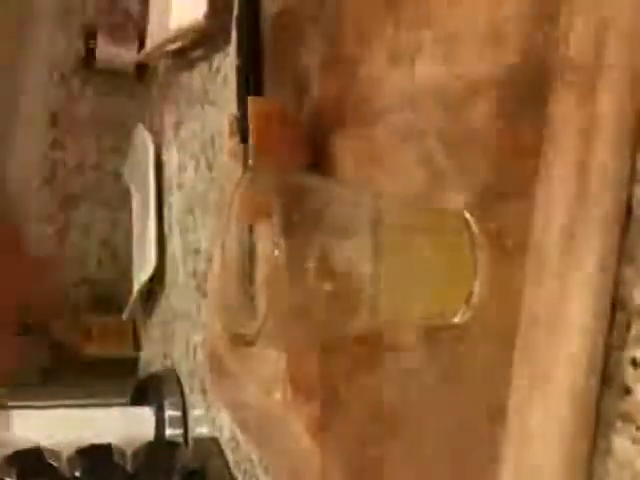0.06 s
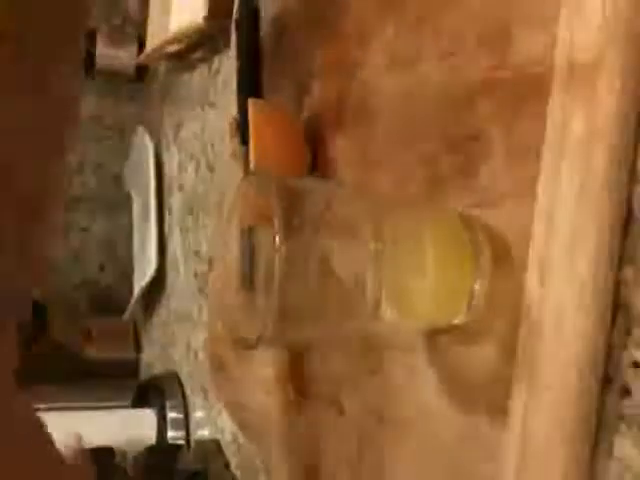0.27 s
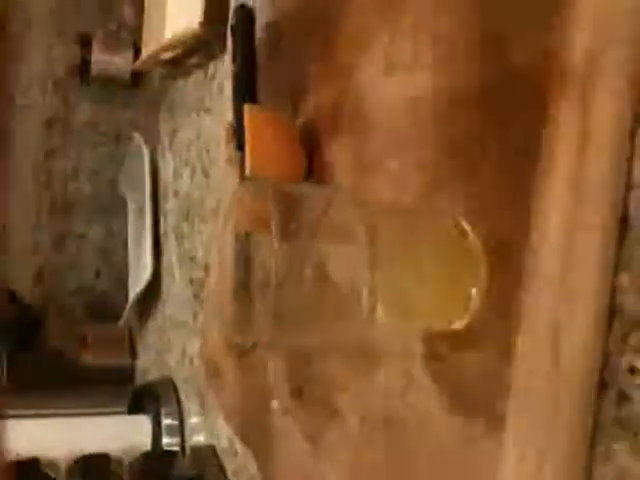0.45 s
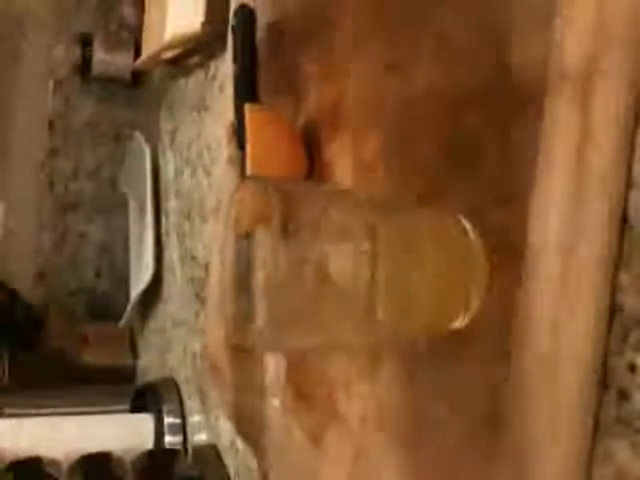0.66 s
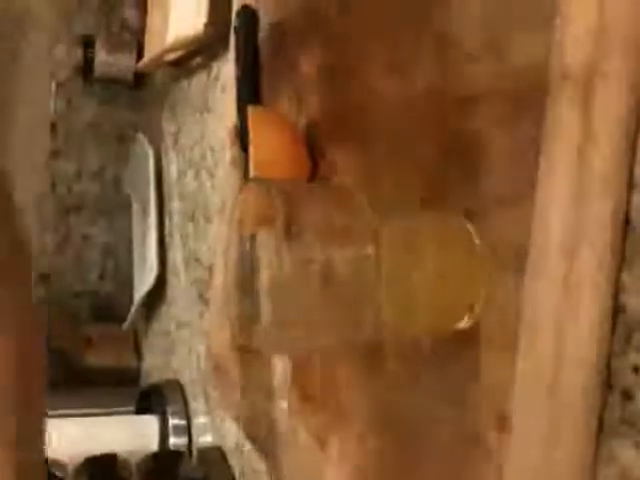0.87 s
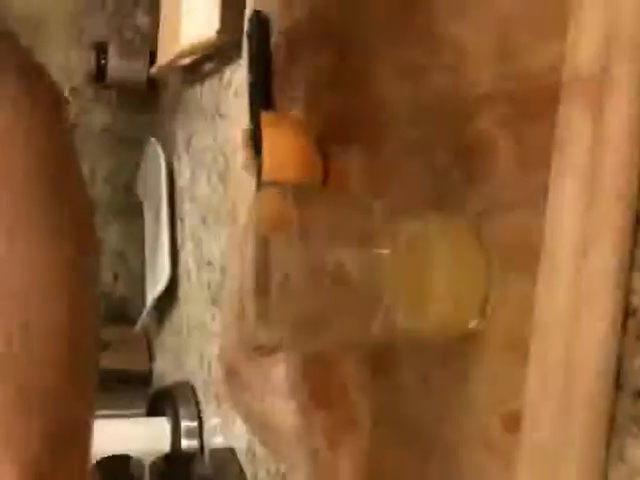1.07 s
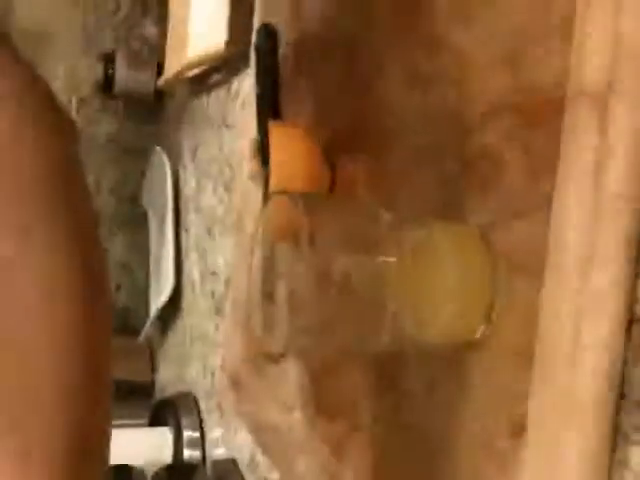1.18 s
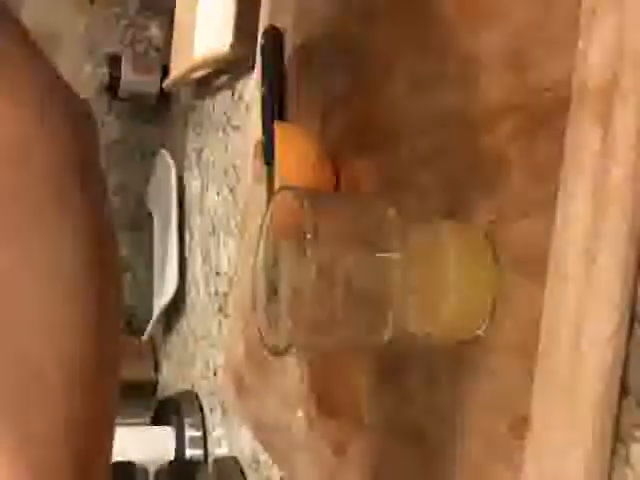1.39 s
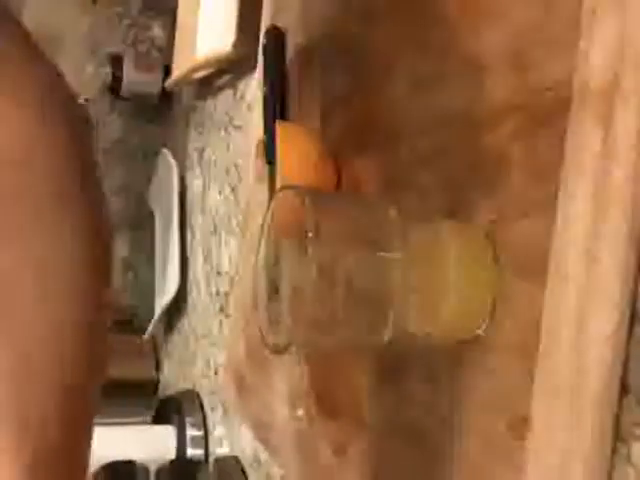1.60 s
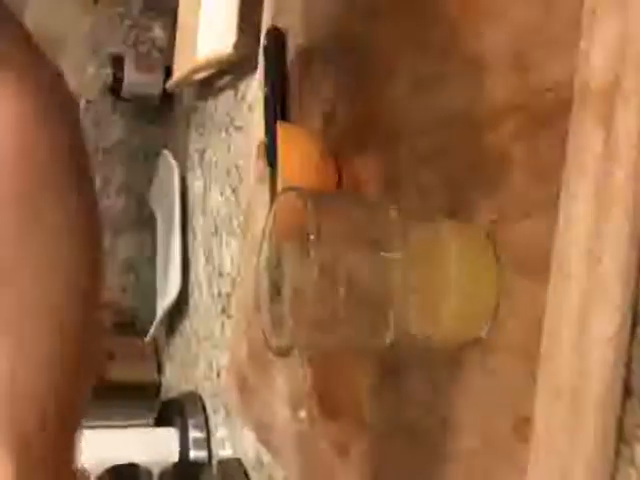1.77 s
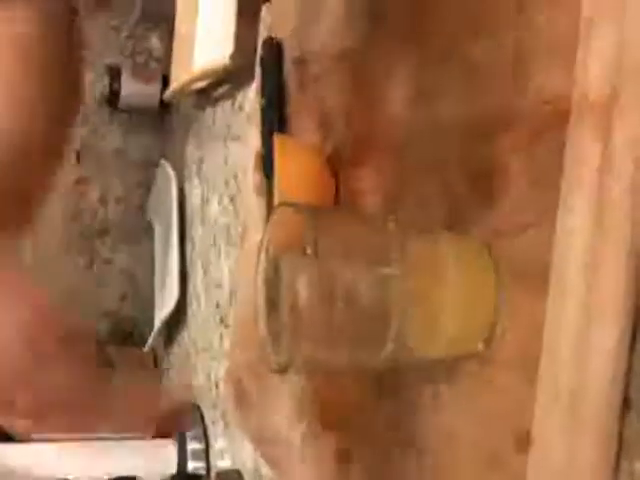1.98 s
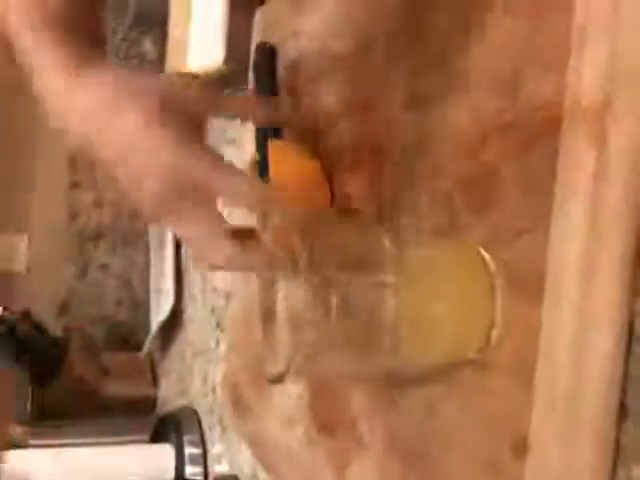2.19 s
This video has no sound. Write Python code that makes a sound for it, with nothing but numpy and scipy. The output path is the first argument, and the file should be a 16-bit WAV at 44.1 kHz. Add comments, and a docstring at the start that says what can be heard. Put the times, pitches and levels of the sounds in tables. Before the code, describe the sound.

A juicer part clacks onto a kitchen counter, followed by light rustling and scraping.

```python
"""Hands at a kitchen counter, close to a mono microphone in a small, hard room, over faint noise.
At 0.2 s a soft bump, then a juicer part is set down: quick contacts crack and ring it, and the
counter damps most of the ring. From 0.3 s, sparse dull bumps on the counter and tiny ticks.
From 0.5 s fruit and hands slide and rustle in three long strokes of friction, each with a faint
low push on the counter; the last stroke is the loudest."""
import sys
import numpy as np
from scipy import signal
from scipy.fft import rfft, irfft
from scipy.io import wavfile

SR = 44100
rng = np.random.default_rng(int(sys.argv[2]) if len(sys.argv) > 2 else 0)


def to_wav(s):
    """Save 16-bit WAV."""
    ch = np.atleast_2d(s).T  # columns
    pcm = np.round(np.clip(ch, -1, 1) * 32767)  # PCM
    wavfile.write(sys.argv[1], SR, pcm.astype(np.int16))


N = 99225

# Noise floor spectrum (frequency [Hz], relative density [dB])
FLOOR_SPECTRUM = [(25, -37), (70, -29), (100, -12), (140, -3), (300, -1.5), (600, -6), (1800, -12),
                  (6500, -12), (10000, -16), (15500, -17)]

# Bumps on the counter (time [s], level [dB], tilt [dB/octave], thud t60 [s],
# spot resonance [Hz], its relative level [dB])
BUMP_HITS = [(.208, -63, 0, 0.091, 520, -2), (.312, -52.5, -5, 0.038, 430, 3),
             (0.5064, -57.5, 0, 0.053, 337, 2.5), (.662, -46.5, 1.5, 0.033, 1270, -2),
             (0.6741, -36.5, 2, 0.037, 543, 2), (.939, -58.5, 0, 0.084, 590, 1),
             (.961, -61, -3, 0.053, 559, -1), (1.018, -63, 3, 0.11, 940, -1),
             (1.03, -70, -4, 0.15, 411, 6.5), (1.201, -63, 1, 0.14, 800, 0),
             (1.331, -53, 5, 0.042, 910, -17), (1.398, -52.5, 4.5, 0.048, 1473, 2.5),
             (1.579, -54, -1, 0.085, 372, 4), (2.0473, -50, 6, 0.091, 647, 3)]
# Thud spectrum (frequency [Hz], relative density [dB])
THUD_SPECTRUM = [(40, -41), (110, -32), (250, -21), (400, 3), (620, 0.5), (1000, 1.5), (1250, -6.5),
                 (2350, -5.5), (2900, -23.5), (8000, -22), (16000, -55)]
# Counter modes (frequency [Hz], relative level [dB], t60 [s])
COUNTER_MODES = [(408, -31, 0.023), (644, -14, 0.088), (766, -11, 0.088), (877, -4.5, 0.11),
                 (1033, -7.5, 0.089), (1395, -4, 0.058), (2345, -10, 0.1)]

# Contacts of the landing juicer part (time [s], relative level [dB])
PART_CONTACTS = [(0.2264, -28), (0.2355, -17.5), (0.241, -16.5), (.2462, -3), (.2483, 1), (0.2504, -3.5),
                 (0.2549, -17), (0.2576, -10.5), (.2665, -21)]
# Crack spectrum of a contact (frequency [Hz], relative density [dB])
CRACK_SPECTRUM = [(40, -34), (110, -32), (250, -18), (450, -9), (650, -3.5), (1000, -2), (1450, -7.5),
                  (1900, 1), (2500, -1.5), (3250, 3.5), (3750, -2), (4500, 1), (5200, -10.5), (7100, 0.5),
                  (7900, -14), (10300, -13.5), (12200, -21), (13200, -31), (16000, -33)]
# Juicer part modes (frequency [Hz], relative level [dB], free t60 [s])
PART_MODES = [(715, -5, .15), (884, -4, .15), (1152, -7, .2), (1808, 3, .8), (1889, 0, .85), (2076, -2, .6),
              (2363, -7, .5), (2876, -3, .35), (3170, 5, .45), (3314, 2, .45), (4268, -5, .45),
              (4591, -8, .5), (6944, 1, .22), (7389, 1, .13)]

# Tiny snaps (time [s], level [dB], pitch [Hz])
TICK_SNAPS = [(.317, -63, 8200), (1.310, -47, 5600), (1.3297, -48, 7000), (1.341, -40.5, 5080),
              (1.3815, -42.5, 5300), (1.393, -52, 7900), (1.451, -48.5, 6850), (1.643, -42, 6760),
              (1.6853, -42.5, 7350), (1.7485, -44.5, 6500), (1.8905, -43, 8360)]

# Stroke envelopes (time [s], relative hiss level [dB], relative scrape level [dB])
FIRST_STROKE = [(.505, -69, -72), (.51, -56.5, -62), (.54, -56.5, -62), (.563, -62.5, -70),
                (.61, -58, -63.5), (.635, -52, -57.5), (.672, -52.5, -61), (.705, -58, -80),
                (.76, -60, -70), (.832, -65.5, -68.5), (.878, -59, -73), (.9, -61.5, -72),
                (.94, -54.5, -66), (.968, -61.5, -64), (1.005, -70, -76), (1.028, -59.5, -62.5),
                (1.07, -77, -78)]
SECOND_STROKE = [(1.105, -77, -70), (1.135, -63.5, -71), (1.18, -63, -72.5), (1.24, -58.5, -63.5),
                 (1.29, -55, -60.5), (1.328, -53, -61), (1.3305, -46, -63), (1.346, -50.5, -55),
                 (1.358, -57.5, -81), (1.38, -64, -68), (1.395, -54, -62), (1.415, -62.5, -67),
                 (1.448, -60, -63), (1.475, -73.5, -75), (1.576, -62.5, -69)]
THIRD_STROKE = [(1.576, -68, -58), (1.577, -52, -59.5), (1.618, -55, -57.5), (1.668, -49, -55),
                (1.695, -53, -59), (1.75, -49.5, -54.5), (1.789, -52, -61.5), (1.832, -43.5, -50),
                (1.865, -43, -50.5), (1.905, -36.5, -56.5), (1.919, -38.5, -50.5), (1.955, -51, -64),
                (1.975, -53, -63), (1.992, -50, -59), (2.044, -63, -66), (2.046, -52.5, -53.5),
                (2.092, -70, -75), (2.2, -78, -85)]
# Friction spectra (frequency [Hz], relative density [dB])
HISS_SPECTRUM = [(700, -24.5), (1300, -12.5), (2100, -1.5), (3000, -3), (4200, -3), (5400, 1), (7400, 1),
                 (9000, -3.5), (12000, -8), (15700, -15.5)]
SCRAPE_SPECTRUM = [(30, -40), (75, -32), (125, -8), (220, -2.5), (400, 0), (800, 0.5), (1150, -1),
                   (1900, 0.5), (3000, -15.5), (8000, -22)]

# Hand presses on the counter (time [s], level [dB])
HAND_PUSHES = [(0.507, -80), (1.326, -69), (1.581, -71)]

# Room decay (frequency [Hz], t60 [s])
ROOM_DECAY = [(150, 1), (600, 0.35), (1400, 0.73), (2000, .66), (4500, 0.7), (7200, 0.44), (15000, 0.42)]


def amp(db):
    """Decibels to gain."""
    return 10 ** (np.asarray(db) / 20)


def unit(x):
    """Scale to rms 1."""
    return x / np.sqrt(np.mean(x ** 2) + 1e-20)


def read(table, hz):
    """Interpolate a table over log frequency."""
    table_hz, values = np.transpose(table)
    return np.interp(np.log(hz + 1), np.log(table_hz + 1), values)


def add(mix, start_s, sound):
    """Mix a sound in at start_s."""
    span = mix[round(start_s * SR):][:len(sound)]
    span += sound[:len(span)]


def shaped(x, gain):
    """Filter by gain(hz); rms 1."""
    hz = np.fft.rfftfreq(len(x), 1 / SR)
    return unit(irfft(rfft(x) * gain(hz), len(x)))


def coloured(x, spectrum):
    """Filter by a spectrum table; rms 1."""
    return shaped(x, lambda hz: amp(read(spectrum, hz)))


def fade(t, t60_s):
    """Exponential decay, 60 dB per t60_s."""
    return np.exp(-np.log(1000) * t / t60_s)


def burst(colour, t60_s, size=8192):
    """Decaying noise through a causal filter of shape colour(hz)."""
    gain = unit(colour(np.abs(np.fft.fftfreq(size, 1 / SR))))
    minimum_phase = np.exp(np.conj(signal.hilbert(np.log(gain + 1e-5))))
    envelope = fade(np.arange(size) / SR, t60_s)
    noise = rng.standard_normal(size) * envelope
    puff = np.fft.ifft(np.fft.fft(noise) * minimum_phase).real
    return unit(puff) * np.sqrt(np.mean(envelope ** 2))


def noise_floor(level_db=-71.5):
    """Faint steady background noise."""
    return amp(level_db) * coloured(rng.standard_normal(N), FLOOR_SPECTRUM)


def counter_bumps(modes_db=-6, rise_s=0.00081, spot_t60_ratio=1.07, low_cut_hz=290):
    """Soft blows thud and ring the counter; each spot adds its own resonance."""
    out, t = np.zeros(N), np.arange(SR // 5) / SR
    radiation = signal.butter(2, low_cut_hz, "high", fs=SR, output="sos")
    soft_onset = np.minimum(t / rise_s, 1)
    for start_s, db, db_per_octave, thud_t60_s, spot_hz, spot_db in BUMP_HITS:
        def tilt(hz):
            return amp(db_per_octave * np.log2(np.clip(hz, 200, 4000) / 800))
        modes = sum(amp(modes_db + mode_db) * tilt(hz) * np.sin(2 * np.pi * hz * t) * fade(t, t60_s)
                    for hz, mode_db, t60_s in COUNTER_MODES)
        spot = amp(spot_db) * np.sin(2 * np.pi * spot_hz * t) * fade(t, thud_t60_s * spot_t60_ratio)
        ring = signal.sosfilt(radiation, (modes + spot) * soft_onset)
        thud = burst(lambda hz: amp(read(THUD_SPECTRUM, hz)) * tilt(hz), thud_t60_s)
        add(out, start_s, amp(db) * ring)
        add(out, start_s, amp(db) * thud)
    return out


def juicer_clack(crack_db=-26.5, ring_db=-40.5, free_db=-25.5, radiated_hz=(434, 10000)):
    """Each contact cracks and adds energy to the part's ring; the counter damps most of it at once."""
    cracks, energy_in, t = np.zeros(N), np.zeros(N), np.arange(N) / SR
    for start_s, db in PART_CONTACTS:
        crack = burst(lambda hz: amp(read(CRACK_SPECTRUM, hz)), t60_s=0.036)
        add(cracks, start_s, amp(db + crack_db) * crack)
        add(energy_in, start_s, amp([db]) ** 2)

    def swing(t60_s):
        """Amplitude from stored, leaking energy."""
        kept_per_sample = fade(1 / SR, t60_s) ** 2
        return np.sqrt(signal.lfilter([1], [1, -kept_per_sample], energy_in + 1e-20))
    damped = swing(t60_s=0.046)
    ring = np.zeros(N)
    for hz, db, free_t60_s in PART_MODES:
        envelope = damped + amp(free_db) * swing(free_t60_s)
        ring += amp(ring_db + db) * np.sin(2 * np.pi * hz * t) * envelope
    radiation = signal.butter(2, radiated_hz, "band", fs=SR, output="sos")
    return cracks + signal.sosfilt(radiation, ring)


def ticks(width_octaves=0.17, skirt_db=-14.5):
    """Tiny snaps: a narrow noise peak over a broad treble skirt."""
    out = np.zeros(N)
    for start_s, db, pitch_hz in TICK_SNAPS:
        def colour(hz):
            peak = np.exp(-(np.log2((hz + 1) / pitch_hz) / width_octaves) ** 2)
            return peak + amp(skirt_db) * hz / (hz + pitch_hz)
        add(out, start_s, amp(db) * burst(colour, t60_s=0.013))
    return out


def friction(slips_per_s=6000, spread_db=3.0, smooth_share=0.7):
    """Many tiny slips of uneven size over a smooth rub."""
    impulses = (rng.random(N) < slips_per_s / SR) * rng.choice([-1, 1], N)
    sizes = amp(spread_db * np.minimum(rng.exponential(1, N), 5))
    slips, smooth = unit(impulses * sizes), rng.standard_normal(N)
    return np.sqrt(1 - smooth_share) * slips + np.sqrt(smooth_share) * smooth


def sliding_strokes(flutter_db=1.24, flutter_s=0.013, firm_db=-38.5, fizz_power=1.64, fizz_hz=9300):
    """Fruit and hands rub: hiss and low scrape, plus fizz that grows faster under firm pressure."""
    hiss_trim_db, scrape_trim_db, fizz_trim_db = -1, -1.5, -0.5
    t, hiss_gain, scrape_gain = np.arange(N) / SR, np.zeros(N), np.zeros(N)
    for stroke in (FIRST_STROKE, SECOND_STROKE, THIRD_STROKE):
        times_s, hiss_db, scrape_db = np.transpose(stroke)
        inside = (t >= times_s[0]) & (t < times_s[-1])
        hiss_gain += inside * amp(np.interp(t, times_s, hiss_db))
        scrape_gain += inside * amp(np.interp(t, times_s, scrape_db))
    wander = shaped(rng.standard_normal(N), lambda hz: np.exp(-(hz * flutter_s) ** 2))
    fizz_gain = amp(firm_db + fizz_trim_db) * (hiss_gain / amp(firm_db)) ** fizz_power
    fizz = fizz_gain * shaped(friction(), lambda hz: hz ** 4 / (hz ** 4 + fizz_hz ** 4))
    hiss = amp(hiss_trim_db) * hiss_gain * coloured(friction(), HISS_SPECTRUM)
    scrape = amp(scrape_trim_db) * scrape_gain * coloured(friction(), SCRAPE_SPECTRUM)
    return amp(flutter_db * wander) * (hiss + scrape + fizz)


def hand_pushes(corner_hz=70.6):
    """A hand presses on the counter: faint low puffs."""
    out = np.zeros(N)
    for start_s, db in HAND_PUSHES:
        add(out, start_s, amp(db) * burst(lambda hz: 1 / (1 + (hz / corner_hz) ** 2), t60_s=0.046))
    return out


def room(x, wet_db, onset_s=0.014):
    """Direct sound plus dense reflections; each band decays at its own rate."""
    hz, t, bands = signal.stft(rng.standard_normal(SR), SR, nperseg=256)
    decay = fade(t, read(ROOM_DECAY, hz)[:, None])
    _, tail = signal.istft(bands * decay, SR, nperseg=256)
    tail *= np.minimum(np.arange(len(tail)) / SR / onset_s, 1) ** 2
    return x + amp(wet_db) * signal.fftconvolve(x, tail / np.linalg.norm(tail))[:N]


def scene():
    """All sources in the room over the noise floor; both channels equal."""
    clack = room(juicer_clack(), wet_db=-10.5)
    counter = room(counter_bumps() + hand_pushes(), wet_db=-15)
    rustle = room(sliding_strokes() + ticks(), wet_db=-12.5)
    mono = clack + counter + rustle + noise_floor()
    return np.array([mono, mono])


def record(dry):
    """Recorder band limit: steep low-pass."""
    edge_hz = 15850
    low_pass = signal.firwin(511, edge_hz, window=("kaiser", 9), fs=SR)
    return signal.oaconvolve(dry, low_pass[None], "same")


dry = scene()
out = record(dry)
to_wav(out)
```